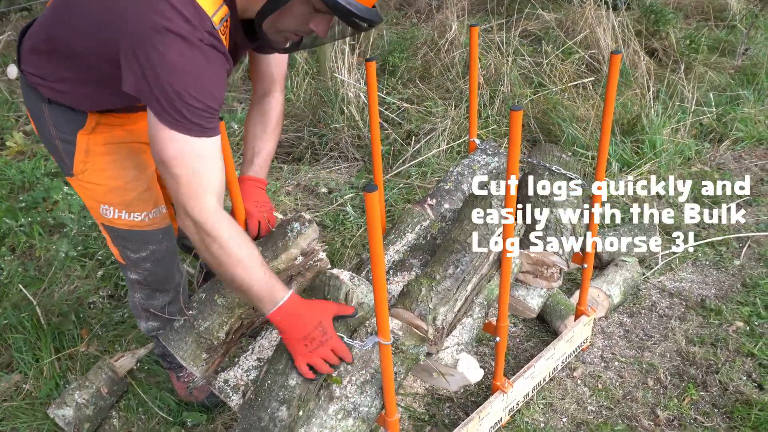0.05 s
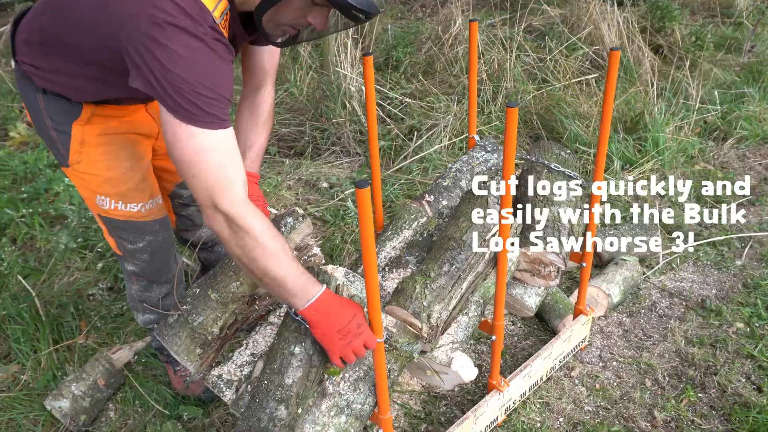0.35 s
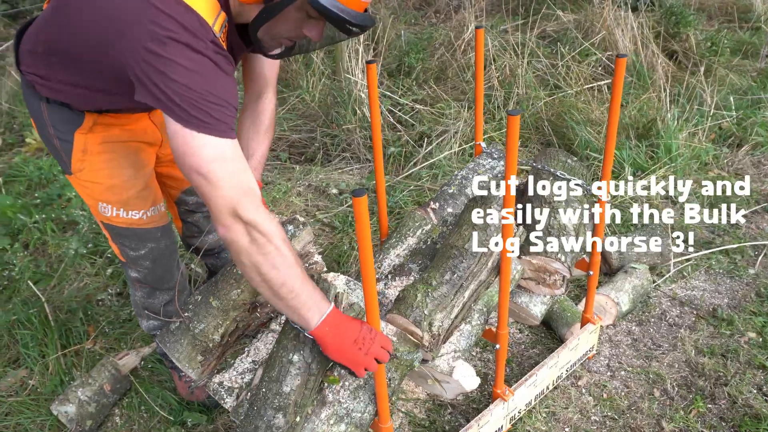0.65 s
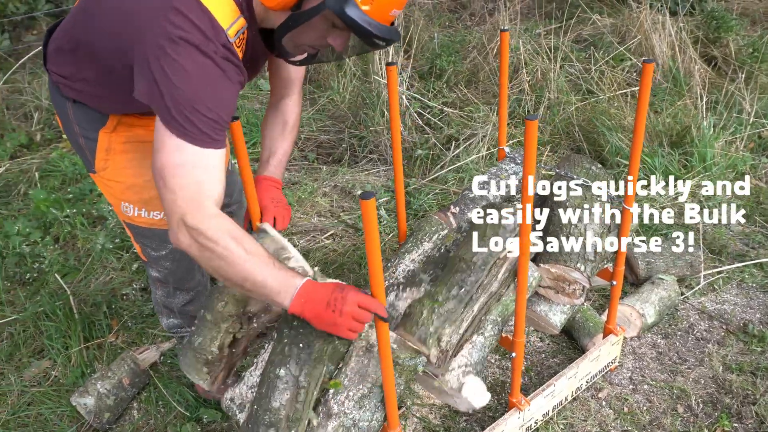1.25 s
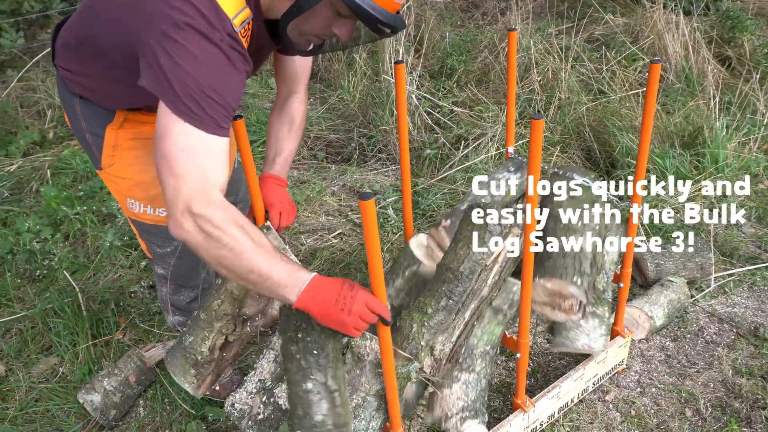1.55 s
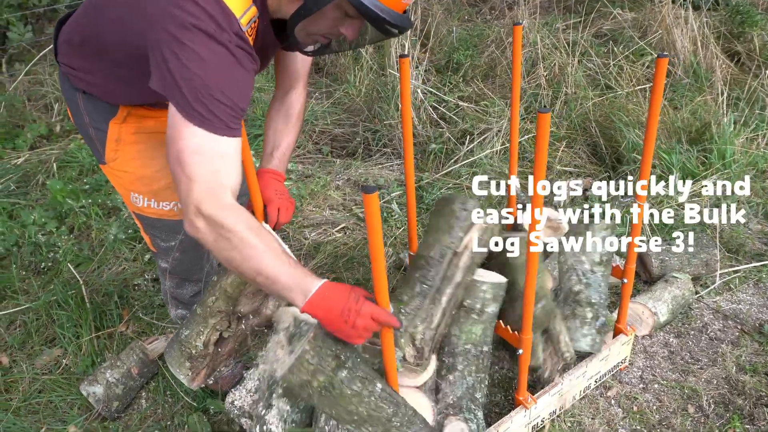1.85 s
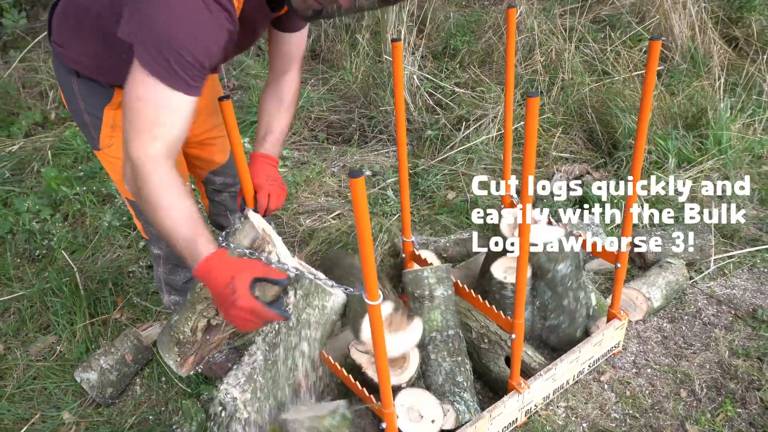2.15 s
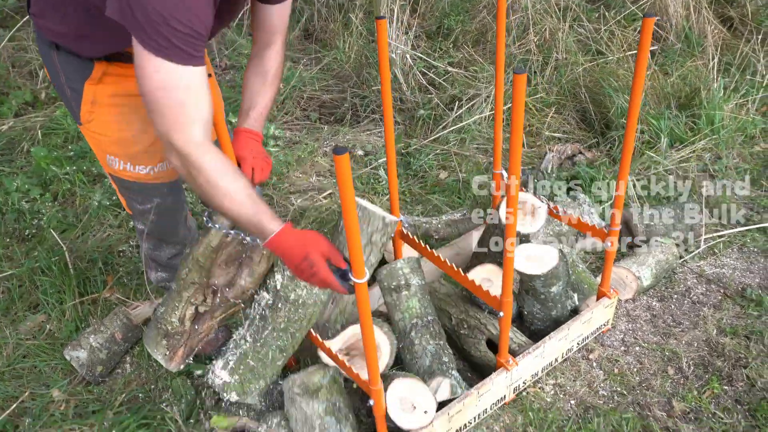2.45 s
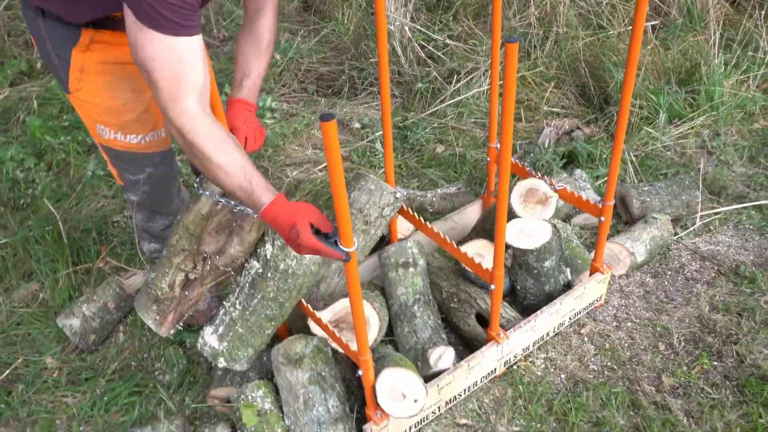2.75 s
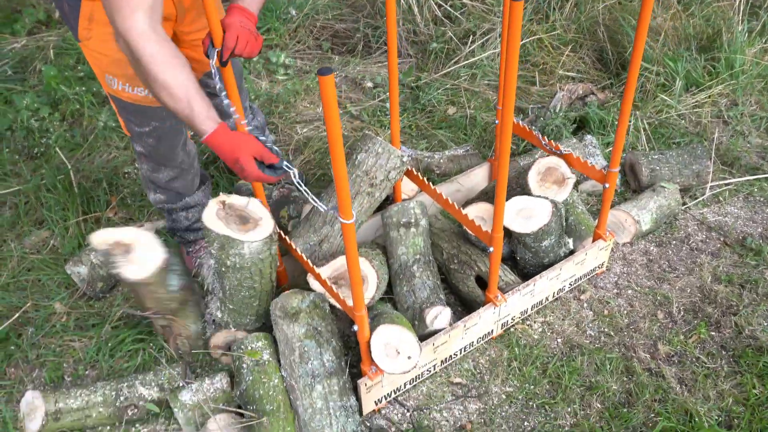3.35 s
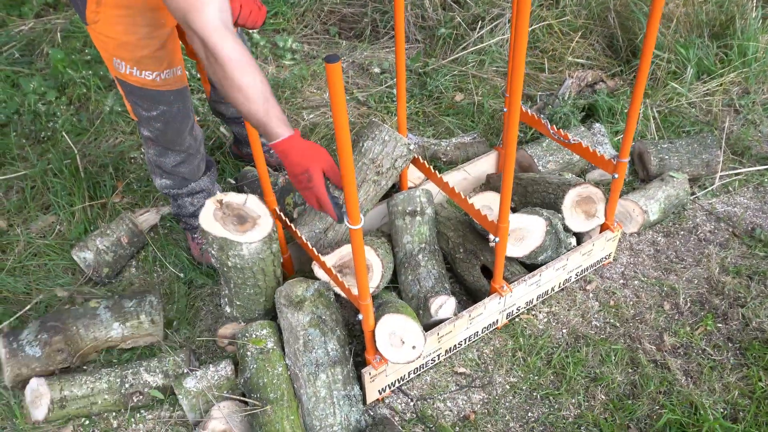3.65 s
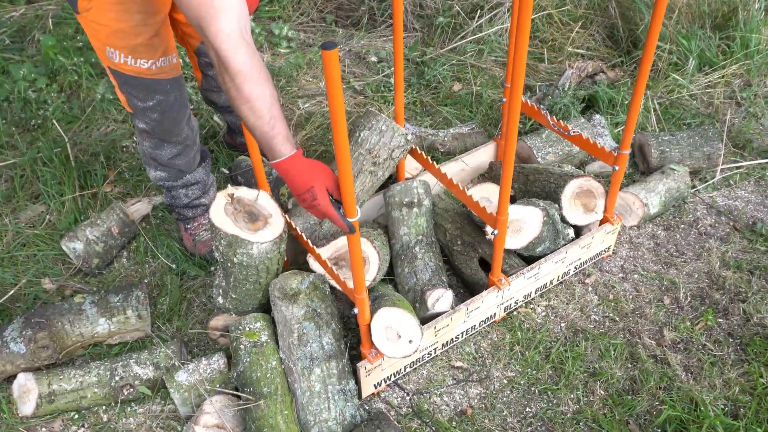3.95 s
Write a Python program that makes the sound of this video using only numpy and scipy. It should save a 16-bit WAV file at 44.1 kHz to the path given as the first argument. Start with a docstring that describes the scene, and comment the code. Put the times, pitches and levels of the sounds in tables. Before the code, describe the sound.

Sawn logs tumble from a steel sawhorse, thudding on grass as a chain clinks.

```python
"""Sawn logs are freed from a steel sawhorse outdoors and tumble onto grass.
Light wind rumbles throughout; at first the chain ticks once and bark scrapes and scuffs faintly.
From 1 s logs knock on each other, and the chain clinks on the posts and is drawn along.
From 1.8 s logs thud on the soil; from 2.2 s they strike the toothed steel bars, which ring.
Bark scrapes, cracks and crumbles between the blows, which weaken towards the end."""
import sys
import numpy as np
from scipy import signal
from scipy.fft import rfft, irfft
from scipy.io import wavfile

SR = 44100
rng = np.random.default_rng(int(sys.argv[2]) if len(sys.argv) > 2 else 0)


def persist_wave(psi):
    """Save psi, clipped to +-1, as 16-bit WAV."""
    counts = np.round(np.clip(psi, -1, 1) * 32767).astype(np.int16)
    wavfile.write(sys.argv[1], SR, np.atleast_2d(counts).T)


N = 176400
AGE_S = np.arange(SR // 4) / SR  # time since an impact
CHAIN_DETUNE = 0.011  # relative standard deviation of mode frequency

# Overall tone of the knocks and scrapes, bright near 8 kHz, duller above.
# Each row: frequency in Hz, gain in dB.
KNOCK_AND_SCRAPE_EQ = [(170, -18), (330, -8), (600, -6.5), (2200, -3.5), (4200, -4.5), (5800, -6),
                       (7800, -2.5), (10500, -12), (15000, -10.5)]
# Chain modes. Each row: frequency in Hz, gain in dB, T60 at the hardest hit in seconds.
CHAIN_MODES = [(1782, -9, .035), (3450, -10, .025), (4520, -4, .035), (7380, -1, .07), (8300, -7, .04)]
# Steel bar modes. Each row: frequency in Hz, gain in dB, T60 at the hardest hit in seconds.
BAR_MODES = [(1700, -8, .05), (3210, -10, .05), (4335, -6, .14), (4660, -9, .07), (5319, -6, .13),
             (6330, -8, .06), (7395, -5, .08), (8525, -4, .075), (12750, -19, .11)]


def from_db(db):
    """Decibels to gain."""
    return 10 ** (np.asarray(db) / 20)


def unit_rms(x):
    """Scale to RMS 1."""
    return x / np.sqrt(np.mean(x ** 2) + 1e-20)


def db_at(spectrum, hz):
    """Interpolate a spectrum over log frequency."""
    points_hz, points_db = np.transpose(spectrum)
    return np.interp(np.log(hz), np.log(points_hz), points_db)


def bandpass(x, low_hz, high_hz):
    """Causal Butterworth band-pass."""
    sos = signal.butter(2, [low_hz, min(high_hz, SR * .45)], "band", fs=SR, output="sos")
    return signal.sosfilt(sos, x + 1e-18)


def lowpass(x, hz):
    """Causal Butterworth low-pass."""
    return signal.sosfilt(signal.butter(2, hz, fs=SR, output="sos"), x)


def drift(rate_hz):
    """Unit Gaussian knots joined by straight lines."""
    knots = rng.standard_normal(2000)
    return np.interp(np.arange(N) / SR * rate_hz, np.arange(len(knots)), knots)


def add(out, start_s, sound):
    """Mix a sound in at start_s."""
    i = int(start_s * SR)
    out[i:i + len(sound)] += sound[:max(N - i, 0)]


def clicks(length, per_s, spread_db=3):
    """Random impulses, mostly small, a few large."""
    sizes = from_db(spread_db * np.minimum(rng.exponential(1, length), 3.5))
    return (rng.random(length) < per_s / SR) * sizes


def decay(t60_s):
    """Exponential envelope."""
    return from_db(-60 * AGE_S / t60_s)


def ring(hz, t60_s):
    """One damped mode."""
    return np.sin(2 * np.pi * hz * AGE_S) * decay(t60_s)


def contact(decay_s, chatter=0.27):
    """Unit-energy force: a first touch, then tiny impacts that build and die."""
    pressure = np.exp(-AGE_S / decay_s) - np.exp(-5 * AGE_S / decay_s)
    force = chatter * rng.laplace(size=len(AGE_S)) * (rng.random(len(AGE_S)) < .2) * pressure
    force[0] = 1
    return force / np.sqrt(np.sum(force ** 2))


def excite(force, response):
    """Drive a body with a force."""
    return signal.fftconvolve(force, response)[:len(force)]


def tick():
    """Dry, bright noise burst, peak 1."""
    burst = bandpass(rng.laplace(size=len(AGE_S)) * decay(t60_s=0.031), 1350, 13300)
    return burst / np.abs(burst).max()


def wind(rms_db=-37):
    """Wind rumble under a faint outdoor hiss."""
    # Air noise. Each row: frequency in Hz, relative spectral density in dB.
    spectrum = [(25, 3), (110, -31), (300, -37.5), (8000, -48.5), (15000, -63)]
    hz = np.maximum(np.arange(N // 2 + 1) * SR / N, 1)
    shaped = rfft(rng.standard_normal(N)) * from_db(db_at(spectrum, hz))
    return from_db(rms_db) * unit_rms(irfft(shaped, N))


def bark_scrape(clump_db=5, patch_db=3, flicker_hz=54.72):
    """Bark slides on bark, steel and grass: sparse bass bumps, mid snaps, fine treble grit."""
    # Scrape envelope. Each row: time in seconds, then bass, mid and treble gain in dB.
    envelope = [(0, -62, -60.5, -65.5), (1.17, -62.5, -66.5, -62.5), (1.266, -40.5, -40.5, -43.5),
                (1.53, -44.5, -44.5, -46), (1.62, -39.5, -40, -46), (1.72, -31.5, -38, -34.5),
                (1.97, -28, -31, -33), (2.11, -31.5, -31.5, -32.5), (2.25, -31.5, -27, -23.5),
                (2.31, -42, -36.5, -32), (2.37, -35, -34, -35), (2.57, -36, -41, -37),
                (2.882, -45.5, -39.5, -49.5), (2.97, -46.5, -51, -48), (3.089, -31, -35.5, -40.5),
                (3.39, -48.5, -41.5, -34.5), (3.45, -44.5, -43.5, -46), (3.63, -43, -47.5, -44.5),
                (3.739, -38, -32, -33.5), (3.88, -55, -51, -55)]
    times_s, *gains_db = np.transpose(envelope)
    curves_db = [np.interp(np.arange(N) / SR, times_s, db) for db in gains_db]
    impulses = [clicks(N, per_s) for per_s in (220, 2200, 6600)]
    common_db = clump_db * drift(flicker_hz)
    edges_hz = np.geomspace(140, 16000, 29)
    out = np.zeros(N)
    for low_hz, high_hz in zip(edges_hz, edges_hz[1:]):
        hz = np.sqrt(low_hz * high_hz)
        register = np.searchsorted([800, 4000], hz)  # bass, mid or treble
        grains = unit_rms(bandpass(impulses[register] * rng.standard_normal(N), low_hz, high_hz))
        band_db = curves_db[register] + db_at(KNOCK_AND_SCRAPE_EQ, hz) + patch_db * drift(flicker_hz)
        out += grains * from_db(band_db + common_db) / 2
    return out


def dry_ticks():
    """Short dry ticks: a chain tick at the very start, then cracks of bark."""
    # Ticks. Each row: start in seconds, peak in dB.
    ticks = [(0.023, -15.5), (1.231, -22), (1.46, -13), (1.577, -17), (1.600, -21), (2.171, -11.5),
             (3.081, -13.5), (3.673, -18.5)]
    out = np.zeros(N)
    for start_s, db in ticks:
        add(out, start_s, from_db(db) * tick())
    return out


def bark_scuffs(length_s=0.036):
    """A log slips a little: a brief swell of dense grains."""
    # Slips. Each row: start in seconds, band centre in Hz, RMS level in dB.
    slips = [(0.48, 1380, -50.5), (0.538, 1880, -51), (0.711, 2880, -55), (1.053, 900, -44),
             (1.270, 1050, -33.5), (3.129, 530, -33), (3.453, 2310, -37.5)]
    out = np.zeros(N)
    swell = np.hanning(int(length_s * SR))
    for start_s, hz, db in slips:
        grains = clicks(len(swell), per_s=SR) * rng.standard_normal(len(swell))
        add(out, start_s, from_db(db) * unit_rms(swell * bandpass(grains, hz / 2, hz * 2)))
    return out


def log_knocks(attack_s=0.01):
    """Rough bark contact drives each log's damped modes; a square hit sounds one clear note."""
    # Log impacts. Each row: start in seconds, contact decay in ms, attack RMS in dB per mode range.
    impacts = [(0.966, 6.8, -38, -34, -29, -39), (0.976, 1.5, -76, -33.5, -27.5, -36.5),
               (1.171, 1.1, -51, -44, -31.5, -43.5), (1.406, 2.9, -39, -21.5, -22.5, -30),
               (1.645, 14.4, -29, -29.5, -41, -39.5), (1.678, 15.5, -34, -40, -26.5, -23.5),
               (1.708, 12.3, -38, -38, -20.5, -22), (1.747, 4.1, -42, -25.5, -20.5, -30),
               (1.792, 2.1, -28, -25, -26.5, -37), (1.897, 3.1, -25, -35, -39.5, -34.5),
               (1.996, 5.9, -23, -27.5, -25, -31.5), (2.0281, 1.8, -29, -24, -11.5, -18.5),
               (2.04, 15, -26, -24.5, -24, -26.5), (2.068, 1.8, -12.5, -16.5, -20.5, -28),
               (2.136, 4.9, -29.5, -23, -28, -24), (2.196, 17, -40, -35, -29.5, -39),
               (2.243, 1.5, -48, -39, -14, -25), (2.348, 13, -25, -22, -24, -22.5),
               (2.445, 5.8, -25.5, -23.5, -31, -35.5), (2.63, 8, -29, -28.5, -27, -27),
               (3.009, 8.5, -36, -28, -28, -33.5), (3.159, 5, -52, -29.5, -27.5, -33.5),
               (3.349, 2.6, -32, -39, -33.5, -30.5), (3.651, 2.9, -36.5, -35.5, -36.5, -40)]
    # Wood mode ranges (body, knock, clack, crack). Each row: low and high edge in Hz, T60 in seconds.
    mode_ranges = [(128.4, 472, 0.019), (461, 1400, 0.032), (1514, 5000, 0.022), (5200, 14480, 0.0055)]
    # Square hits. Each row: start in seconds, frequency in Hz, level in dB, T60 in seconds.
    notes = [(1.386, 320, -13, 0.02), (1.387, 953, -23, 0.076), (2.028, 1910, -30, 0.083),
             (2.068, 269, -7, 0.029), (2.070, 592, -3.5, 0.056), (2.163, 1232, -12.5, 0.079),
             (2.252, 1152, -19, 0.11)]
    out = np.zeros(N)
    for start_s, contact_ms, *levels_db in impacts:
        force = contact(contact_ms / 1000)
        for k, ((low_hz, high_hz, t60_s), db) in enumerate(zip(mode_ranges, levels_db)):
            count = 7 * 2 ** k  # more modes towards the treble
            modes_hz = low_hz * (high_hz / low_hz) ** ((np.arange(count) + rng.random(count)) / count)
            body = sum(rng.choice([-1, 1]) * from_db(db_at(KNOCK_AND_SCRAPE_EQ, hz)) * ring(hz, t60_s)
                       for hz in modes_hz)
            knock = bandpass(excite(force, body), low_hz, high_hz)
            add(out, start_s, from_db(db) * knock / np.std(knock[:int(attack_s * SR)]))
    for start_s, hz, db, t60_s in notes:
        add(out, start_s, from_db(db) * ring(hz, t60_s))
    return out


def struck_steel(hits, modes, detune, tick_db=1, spread_db=5, damping_exponent=0.42):
    """Each hit ticks and rings the modes; lighter touches stay in contact and damp the steel."""
    out = np.zeros(N)
    hardest_db = max(db for _, db in hits)
    for start_s, db in hits:
        add(out, start_s, from_db(db + tick_db) * tick())
        force = contact(decay_s=0.0025)
        t60_scale = from_db(damping_exponent * (db - hardest_db))
        for hz, mode_db, t60_s in modes:
            partial = excite(force, ring(hz * (1 + detune * rng.normal()), t60_s * t60_scale))
            peak_db = db + mode_db + spread_db * rng.normal()
            add(out, start_s, from_db(peak_db) * partial / np.abs(partial).max())
    return out


def chain_clinks():
    """The chain strikes a post and rings briefly."""
    # Chain impacts. Each row: start in seconds, strength in dB.
    hits = [(.975, -26.5), (1.002, -32.5), (1.683, -17.5), (1.709, -18), (1.747, -21.5), (1.815, -21),
            (2.756, -17), (3.161, -21.5), (3.756, -23)]
    return struck_steel(hits, CHAIN_MODES, CHAIN_DETUNE)


def chain_drag(taps_per_s=150, t60_scale=0.27):
    """Dragged links tap each other and the bars in quick, damped clinks."""
    # Chain pulls. Each row: start and end in seconds, RMS level in dB.
    pulls = [(1.209, 1.34, -46), (2.596, 2.917, -40.5), (3.689, 3.814, -44)]
    out = np.zeros(N)
    for start_s, end_s, db in pulls:
        taps = clicks(int((end_s - start_s) * SR), taps_per_s)
        jingle = 0
        for hz, mode_db, t60_s in CHAIN_MODES + BAR_MODES:
            force = taps * rng.standard_normal(len(taps))
            mode = ring(hz * (1 + CHAIN_DETUNE * rng.normal()), t60_s * t60_scale)
            jingle += from_db(mode_db) * signal.fftconvolve(force, mode)
        add(out, start_s, from_db(db) * unit_rms(jingle))
    return out


def soil_thuds(t60_s=0.074, cutoff_hz=216, crunch_gain=0.35):
    """Soft soil takes a log's weight in a few slow swings and crumbles under it."""
    # Landings. Each row: start in seconds, frequency in Hz, gain in dB.
    landings = [(1.761, 58, -14.5), (1.888, 61.7, -17.5), (2.152, 133, -18.5), (2.196, 82.5, -15),
                (2.479, 105.7, -17), (2.633, 125, -22.5), (3.404, 89, -21.5), (3.723, 78, -17.5)]
    out = np.zeros(N)
    for start_s, hz, db in landings:
        noise = unit_rms(bandpass(rng.standard_normal(len(AGE_S)), hz / 2, cutoff_hz))
        crunch = crunch_gain * noise * decay(2 * t60_s)
        add(out, start_s, from_db(db) * lowpass(crunch - ring(hz, t60_s), cutoff_hz))
    return out


def bar_strikes():
    """Logs strike the toothed steel bars, which ring."""
    # Bar impacts. Each row: start in seconds, strength in dB.
    hits = [(2.192, -22), (2.211, -13.5), (2.252, -9.5), (2.392, -19.5), (2.481, -23), (2.520, -26.5),
            (2.672, -25.5), (2.706, -28.5), (2.815, -30), (2.877, -22.5), (3.267, -30.5), (3.493, -29),
            (3.517, -32), (3.788, -24), (3.807, -45), (3.849, -28)]
    return struck_steel(hits, BAR_MODES, detune=0.0042)


def yard_scatter(x, gain_db=-16, delay_s=0.004):
    """Short reverberation from ground and bushes."""
    tail = lowpass(rng.standard_normal(len(AGE_S)), 13600) * decay(t60_s=0.42) * (AGE_S > delay_s)
    return from_db(gain_db) * excite(x, tail / np.sqrt(np.sum(tail ** 2)))


def scene():
    """Mono mix: wood, bark and steel with scatter; thuds and wind without."""
    near = log_knocks() + bark_scrape() + dry_ticks() + bark_scuffs()
    near += chain_drag() + bar_strikes() + chain_clinks()
    return (near + yard_scatter(near) + soil_thuds() + wind())[None]


def record(dry):
    """Clip at full scale, then low-pass steeply at 16 kHz."""
    sos = signal.ellip(10, .2, 80, 16000, fs=SR, output="sos")
    return signal.sosfilt(sos, np.clip(dry, -1, 1))


dry = scene()
out = record(dry)
persist_wave(out)
```